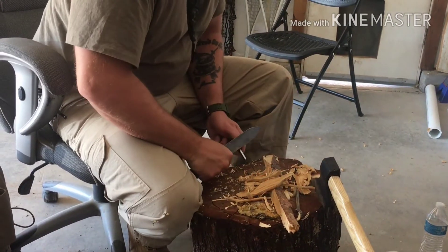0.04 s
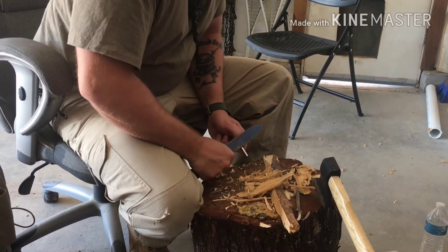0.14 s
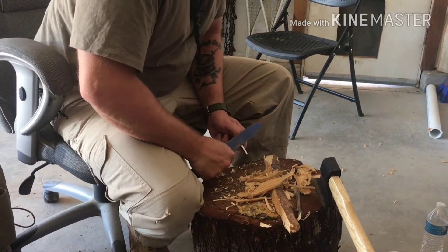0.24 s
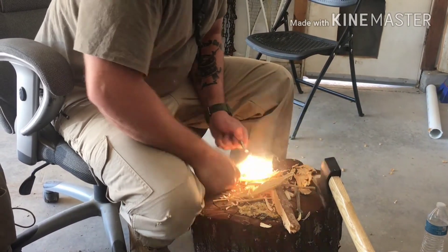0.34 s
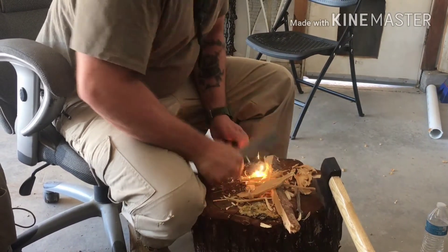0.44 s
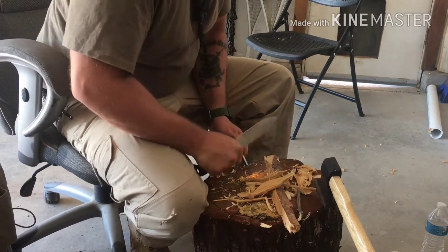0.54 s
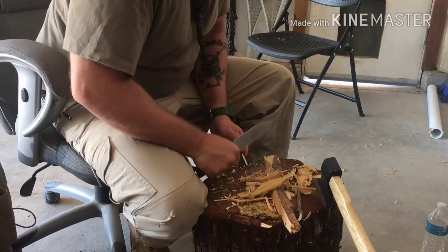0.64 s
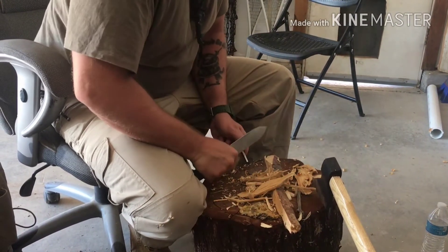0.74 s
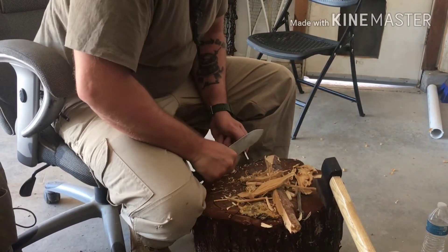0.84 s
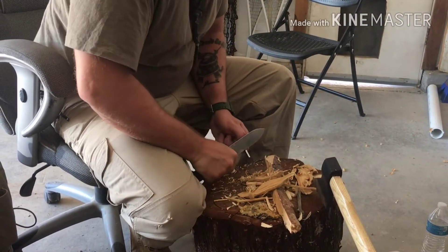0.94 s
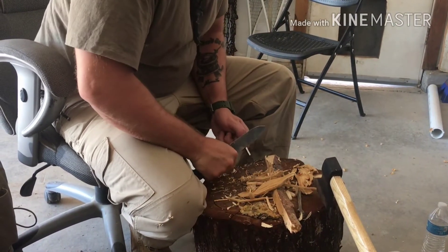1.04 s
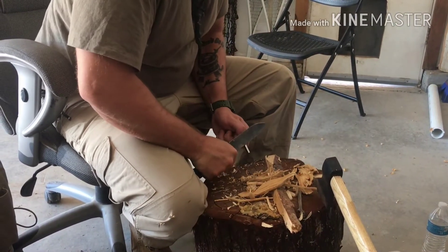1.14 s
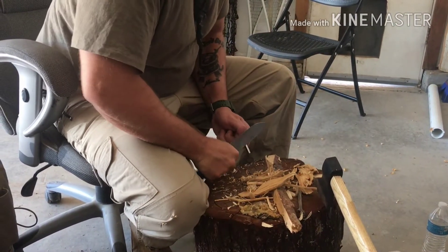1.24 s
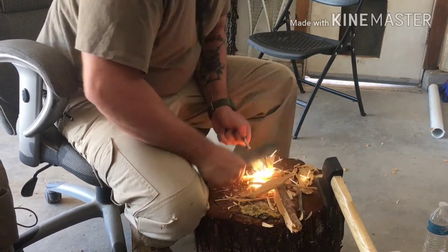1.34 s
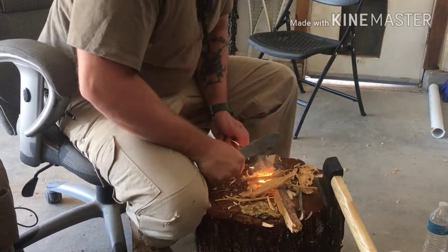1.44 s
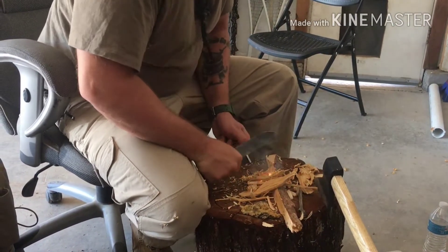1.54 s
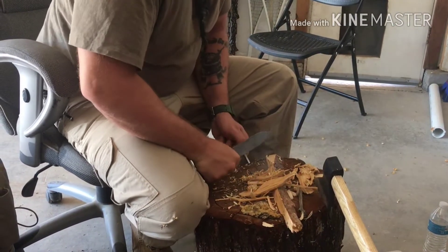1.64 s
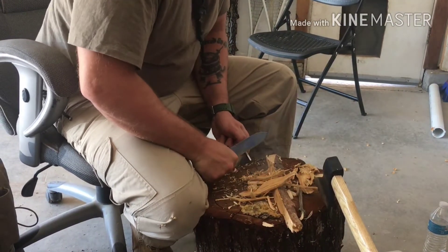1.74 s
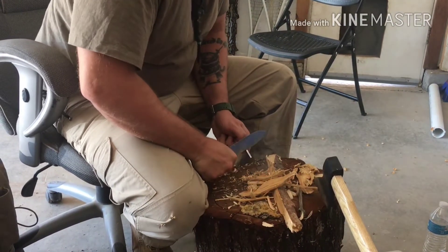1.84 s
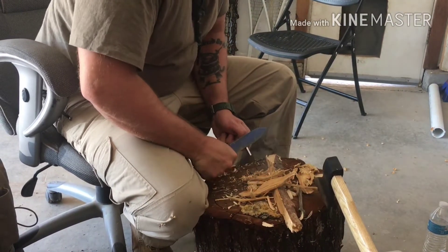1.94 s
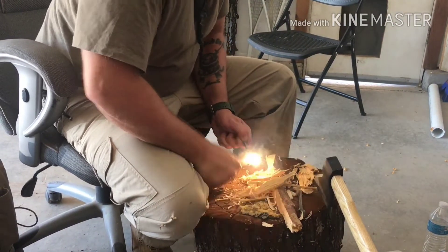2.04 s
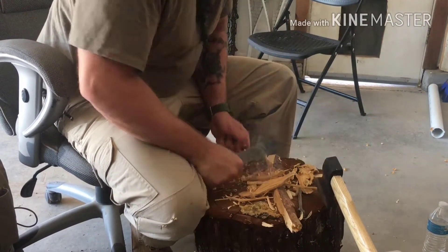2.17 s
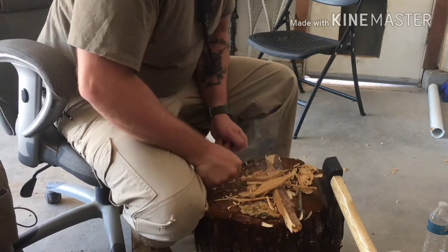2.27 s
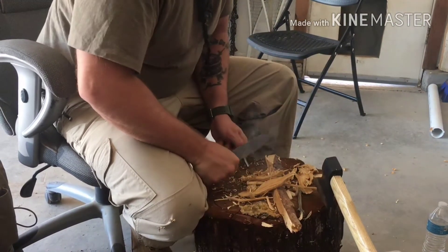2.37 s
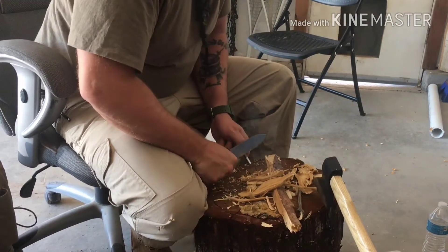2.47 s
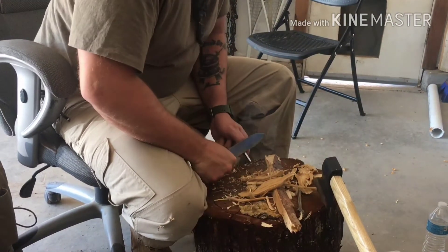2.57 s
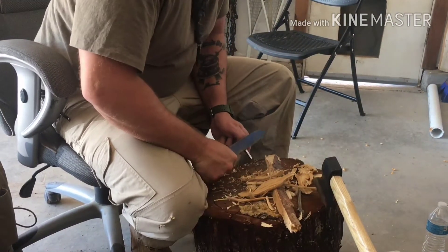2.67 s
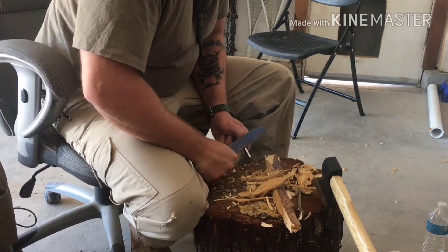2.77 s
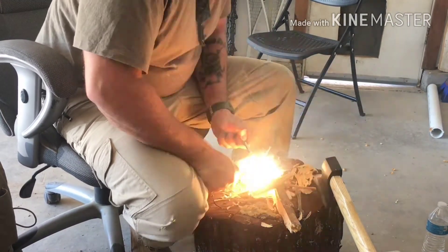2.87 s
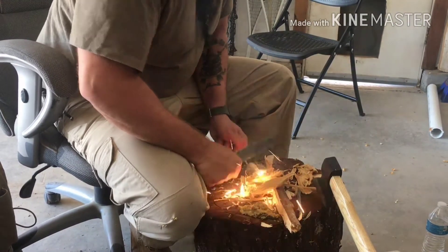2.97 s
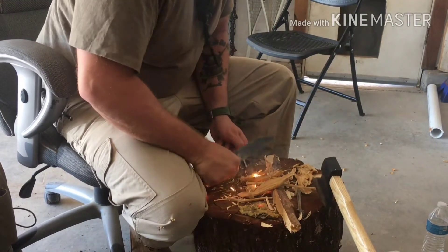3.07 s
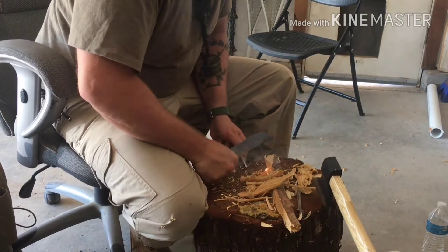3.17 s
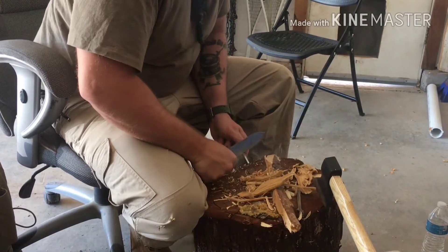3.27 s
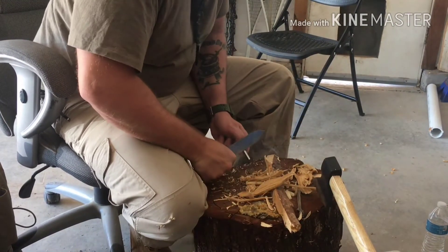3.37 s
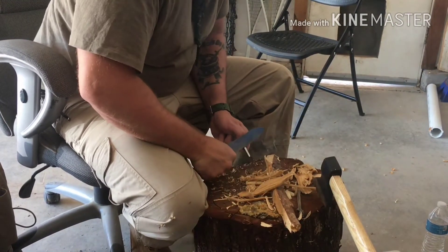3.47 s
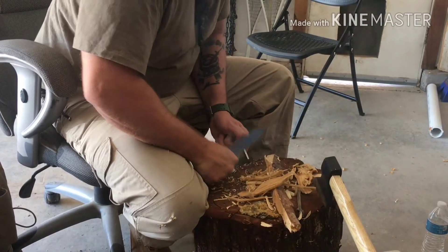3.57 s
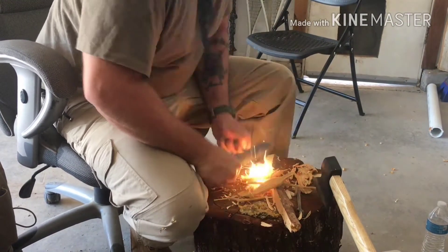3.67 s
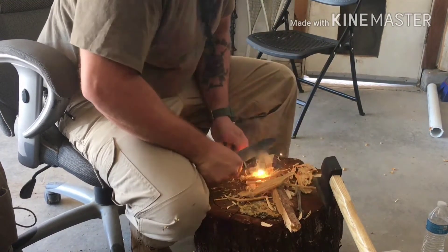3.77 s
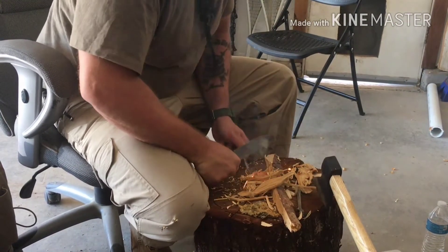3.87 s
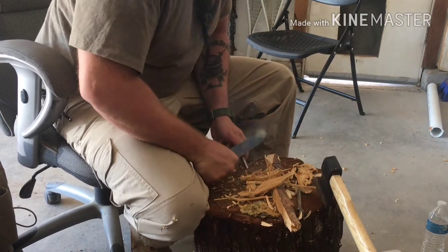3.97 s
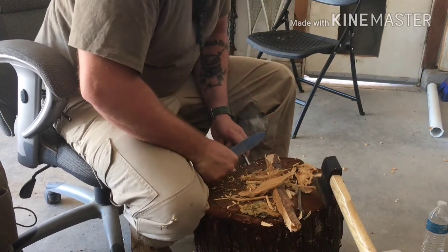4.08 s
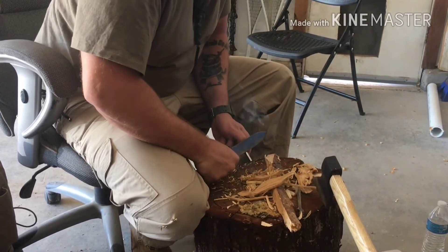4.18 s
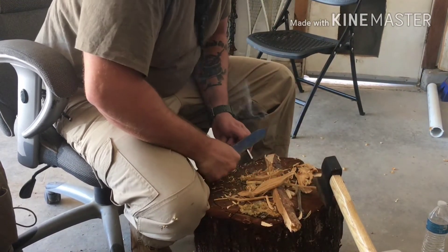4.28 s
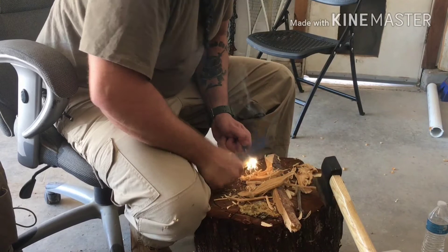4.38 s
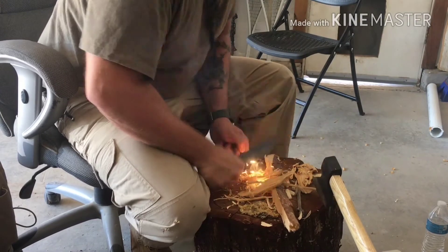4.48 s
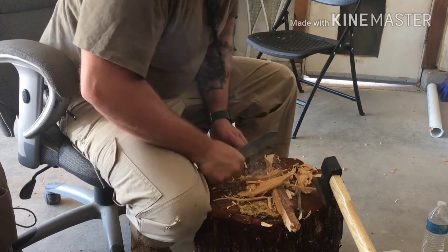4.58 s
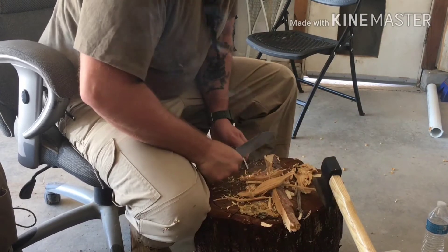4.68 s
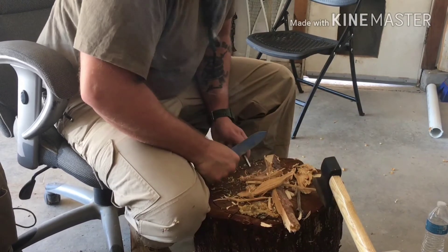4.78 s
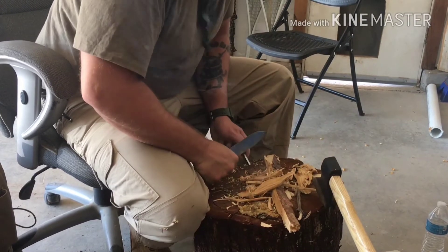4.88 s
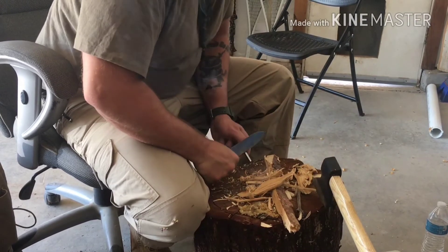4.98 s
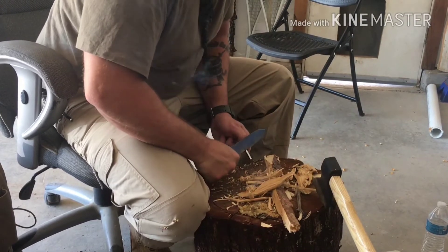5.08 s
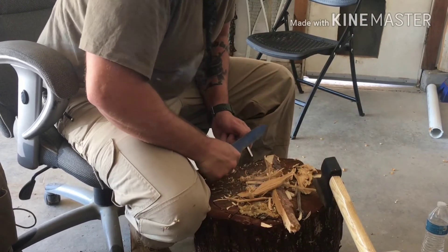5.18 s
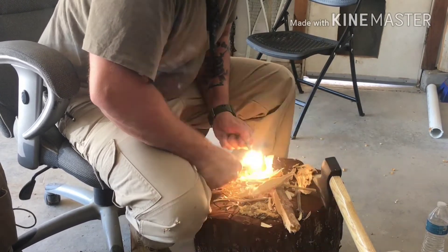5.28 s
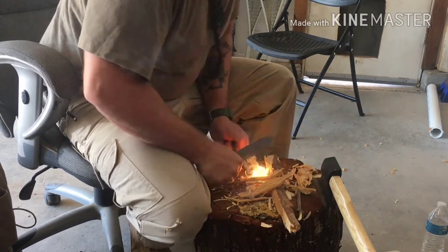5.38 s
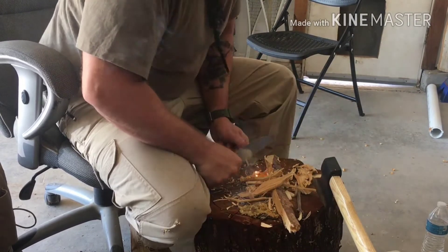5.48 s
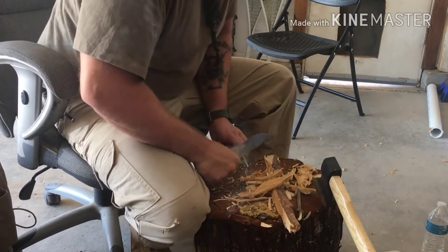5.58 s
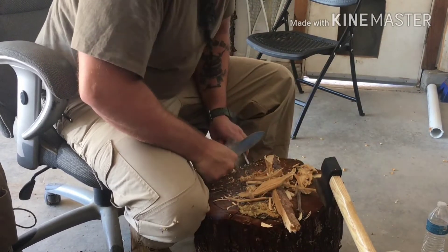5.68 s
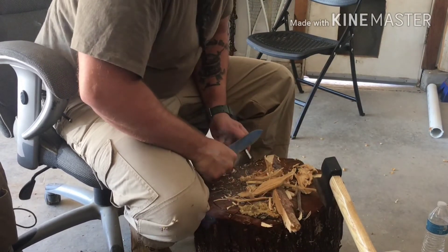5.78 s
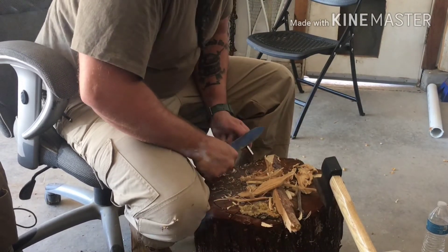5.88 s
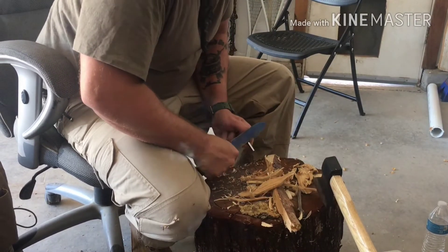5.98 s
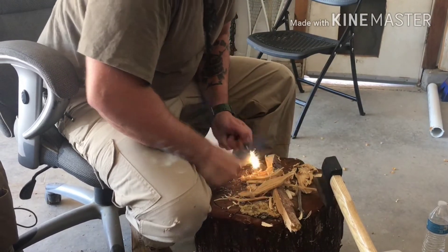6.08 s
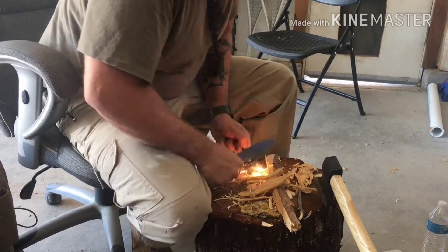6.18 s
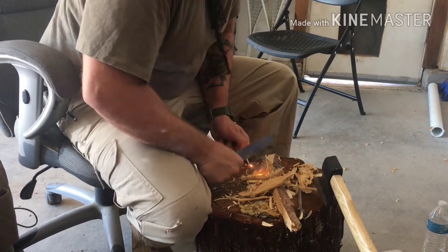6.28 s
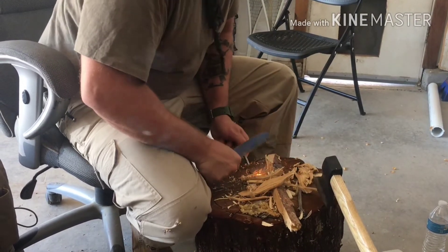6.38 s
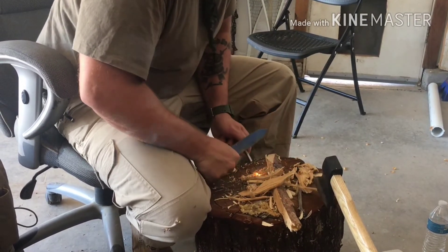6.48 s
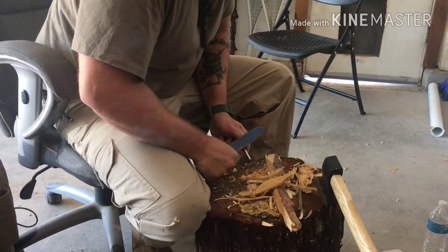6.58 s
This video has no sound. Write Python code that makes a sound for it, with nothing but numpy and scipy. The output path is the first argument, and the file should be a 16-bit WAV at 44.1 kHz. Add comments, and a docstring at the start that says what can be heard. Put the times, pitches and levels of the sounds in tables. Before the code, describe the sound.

A steel edge clicks onto a ferrous rod and tears down it in a very short, harsh scrape, again and again, eight times at a steady pace. Sparks crackle and fizz after each, and the blade rings briefly. Hard garage walls return a short bright echo. Between strokes come a soft hand rub, small woody knocks and late sputters, over quiet air, hum and fading rumble. Close microphone.

```python
"""A knife blade is scraped eight times down a fire steel, in a garage with a faint hum and a low rumble.
Each stroke is friction noise through the modes of blade and rod: a click, a light glide, then a bite that squeals,
rasps and locks onto one resonance after another. Decaying sines let the blade ring on between strokes.
Burning shavings are coloured fracture noise: a hiss, a soft puff and late sputters. A rub, woody knocks and a hollow
note are also heard; noise that decays faster in the treble makes the answer of the bare walls."""
import sys
import numpy as np
from scipy import signal
from scipy.fft import rfft, irfft, next_fast_len
from scipy.io import wavfile
from scipy.ndimage import map_coordinates

SR = 44100
rng = np.random.default_rng(int(sys.argv[2]) if len(sys.argv) > 2 else 0)


def generate_wav(signal):
    """Clip the signal to [-1, 1] and save it as 16-bit WAV at the path in sys.argv[1]."""
    frames = np.transpose(np.atleast_2d(signal))
    scaled = np.clip(frames, -1, 1) * 32767
    pcm = np.round(scaled).astype(np.int16)
    wavfile.write(sys.argv[1], SR, pcm)


N = 291929

# Strokes of the blade: (bite [s], glide length [s], rasp length [s], force [dB], low rod ring [dB re force],
# treble [dB re force], squeal [dB re force], flare reference [dB], ring as the edge flicks off the rod [dB],
# favoured ring [Hz])
STROKE_ROWS = [(0.409, 0.02, 0.021, -31, -1.5, -1.5, -2.5, -33.5, -50, 2350),
               (1.359, 0.0087, 0.018, -31.5, 8, -3.5, -6.5, -36, -60, 3100),
               (2.125, 0.016, 0.021, -28.5, -2.5, 0.5, -1.5, -35, -50.5, 2330),
               (2.921, 0.028, 0.023, -29.5, -1, -1, 4, -34.5, -38.5, 2770),
               (3.682, 0.024, .022, -31.5, 1, -1.5, 5.5, -33.5, -51, 2330),
               (4.461, 0.019, 0.018, -22.5, -10.5, 3.5, -2.5, -31.5, -41.5, 2804),
               (5.347, 0.026, .028, -29, 4.5, -2.5, -5, -36.5, -55.5, 1218),
               (6.158, .022, .021, -27.5, 0, 0.5, 1.5, -35, -50, 4040)]
# Modes of blade and rod pressed together: (frequency [Hz], width [Hz], level [dB])
STEEL_MODES = [(1008, 98, -0.5), (1215, 32, 6.5), (1720, 130, -6.5), (2125, 110, -2.5), (2390, 39, 1),
               (2800, 47, -8.5), (3296, 410, -2), (4074, 100, -4), (4360, 430, -12.5), (5350, 620, -6.5),
               (5780, 530, -7.5), (6870, 220, -13), (8480, 150, -10), (9100, 660, -8.5), (11410, 200, -4),
               (12210, 320, -8.5), (15200, 360, -8)]
# The blade is set on the rod: (time [s], level [dB], then low, middle, high and top modes [dB re level],
# as the point of contact favours them)
LANDINGS = [(0.1768, -40, 4.5, -0.5, 6, -12), (1.017, -53.5, 8, -2.5, -10, -16),
            (1.8854, -32.5, -5.5, 2.5, 2.5, 2.5), (2.639, -51, 1, 1, -6, -7),
            (3.432, -44.5, -2, -1, -13, -6), (4.239, -31.5, -5.5, -1.5, -7.5, -10),
            (5.094, -46.5, 0, -3.5, -10, -19), (5.9, -43, -6, 1.5, -2, -8), (6.610, -49.5, 1, -2, 0, -1.5)]


def amp(db):
    """Level to amplitude: 20 dB are a factor of ten."""
    return 10 ** (np.asarray(db) / 20)


def unit(x):
    """Normalization by the root mean square, to rms 1."""
    return x / np.sqrt(np.mean(x ** 2) + 1e-20)


def along(points, hz):
    """Linear interpolation of (frequency [Hz], value) points on a logarithmic frequency axis."""
    f, v = np.transpose(points)
    return np.interp(np.log(hz + 1), np.log(f), v)


def clock():
    """Uniform sampling: the time of every sample, in s."""
    return np.arange(N) / SR


def wobble(rate):
    """Band-limited random modulation: a smooth curve through random knots, rate of them a second."""
    knots = rng.standard_normal(int(N * rate / SR) + 4)
    return map_coordinates(knots, [np.arange(N) * rate / SR])


def filtered(x, response):
    """Linear filtering: the spectrum of x is multiplied by a response of frequency."""
    m = next_fast_len(len(x) + SR // 10)
    hz = np.fft.rfftfreq(m, 1 / SR)
    return irfft(rfft(x, m) * response(hz), m)[:len(x)]


def coloured(x, points):
    """Spectral shaping by (frequency [Hz], level [dB]) points, at rms 1."""
    return unit(filtered(x, lambda hz: amp(along(points, hz))))


def grit(rate, spread_db, smooth):
    """Shot noise: tiny fractures at random moments and of random, bounded sizes, over a share of even noise."""
    moments = rng.random(N) < rate / SR
    signs = rng.choice([-1, 1], N)
    sizes = amp(spread_db * np.minimum(rng.standard_normal(N), 1))
    return unit(unit(moments * signs * sizes) + smooth * rng.standard_normal(N))


def gate(t, start, end, rise, fall):
    """Smooth switching: a window that opens around start and closes around end."""
    return (1 + np.tanh((t - start) / rise)) * (1 - np.tanh((t - end) / fall)) / 4


def swell(age, rise, t60):
    """Damped decay: a soft rise, then an exponential fall of 60 dB in t60."""
    age = np.maximum(age, 0)
    return (1 - np.exp(-(age / rise) ** 2)) * amp(-60 * age / t60)


def near(s):
    """Windowing: the samples from shortly before s to half a second after it."""
    return slice(max(0, int(s * SR) - SR // 20), min(N, int(s * SR) + SR // 2))


def resonance(f, hz, width):
    """Response of a damped oscillator: one causal resonance."""
    return 1j * f * width / (hz * hz - f * f + 1j * f * width)


def through(force, envelope, response):
    """Forced vibration: an enveloped force drives a body; the output has the envelope's level."""
    return filtered(force * envelope, response) / np.std(filtered(force, response))


def background():
    """Modulated noise and tones: still air, a lumpy low rumble and the unsteady hum of an appliance."""
    # Still air: (frequency [Hz], level [dB per Hz])
    air_colour = [(88, -28.5), (150, -4.5), (259, -7), (340, -12.5), (850, -13.3), (1440, -17),
                  (2960, -25.5), (7110, -30), (15800, -40.5)]
    # Low rumble: (frequency [Hz], level [dB per Hz])
    rumble_colour = [(20, -21.5), (35, -8.5), (55, 10.5), (80, 6.5), (130, -1.5), (250, -34.5)]
    # Partials of the hum: (frequency [Hz], middle level [dB rms])
    hum_partials = [(58, -74), (120, -68.5), (239, -79)]
    air_db = -67.5
    rumble_db, rumble_fade_db_per_s = -61.5, 1  # the rumble slowly dies down
    t = clock()
    air = coloured(rng.standard_normal(N), air_colour) * amp(air_db + 0.73 * wobble(5.5))
    rumble_level = amp(rumble_db - rumble_fade_db_per_s * t + 3.5 * wobble(10))
    rumble = coloured(rng.standard_normal(N), rumble_colour) * rumble_level
    hum = np.zeros(N)
    for hz, db in hum_partials:
        level = amp(db + 2.8 * wobble(10)) * np.sqrt(2)  # sine peak for an rms level
        hum += level * np.sin(2 * np.pi * hz * t + 0.5 * wobble(10))
    return air + rumble + hum


def touch(hz, low_db, middle_db, high_db, top_db):
    """Modal excitation: how strongly a point of contact drives a mode, in dB."""
    points = [(2200, low_db), (3200, 0), (4100, middle_db), (5200, middle_db), (8700, high_db), (11000, top_db)]
    return along(points, hz)


def clicks(crack_db=-5):
    """Impact excitation: the edge lands on the rod with a tiny crack and a brief, damped ring of the steel."""
    # The blade's brief ring while pressed on the rod: (frequency [Hz], level [dB], t60 [s])
    contact_modes = [(1080, -10.5, 0.015), (2219, 2, 0.01), (3200, 1, 0.0089), (4060, -0.5, 0.01),
                     (4660, -3, 0.008), (5330, -1, 0.0069), (7650, -9.5, .005), (8800, 2, .008),
                     (11360, 0.5, .014), (12300, -13, .012)]
    out, t = np.zeros(N), clock()
    for s, db, *point in LANDINGS:
        w = near(s)
        age = t[w] - s
        out[w] += amp(db + crack_db) * rng.standard_normal(len(age)) * swell(age, rise=.0002, t60=.006)
        for k, (hz, level, t60) in enumerate(contact_modes):
            ring = swell(age, rise=.0001, t60=t60) * np.sin(2 * np.pi * hz * age)
            out[w] += (-1) ** k * amp(db + level + touch(hz, *point)) * ring
    return out


def ringing(landing_db=-26, reach=0.032, flick_spread=.05):
    """Free modal decay: landings and flicks favour different blade modes; the moving hand blurs their phase."""
    # Modes of the free blade: (frequency [Hz], level [dB], t60 [s])
    blade_modes = [(1210, -8, .7), (2170, -4, .3), (2330, -4, .33), (2700, 0, .32), (2810, 0, .32),
                   (3860, -3, .3), (4016, 0, .3), (5170, -4, .26), (8807, -7, .14), (10870, -6, .17),
                   (11420, -4, .14)]
    # Flicks that also catch the blade's tip: (time [s], level [dB])
    tip_flicks = [(.43, -42), (2.146, -32), (4.479, -37)]
    tip_hz = 10870  # the tip's own mode
    out, t = np.zeros(N), clock()
    # (time, dB, favoured Hz, share of all the other modes)
    flicks = [(bite + rasp_s, db, hz, flick_spread) for bite, _, rasp_s, *_, db, hz in STROKE_ROWS]
    flicks += [(s, db, tip_hz, 0) for s, db in tip_flicks]
    for hz, level, t60 in blade_modes:
        drift = wobble(130)
        plucks = []  # (time, gain, phase blur in rad)
        for s, db, *point in LANDINGS:
            landing = db + landing_db + touch(hz, *point) + 2 * rng.standard_normal()
            plucks.append((s, amp(landing), .45))
        for s, db, favoured, others in flicks:
            nearness = np.exp(-(np.log(hz / favoured) / reach) ** 2)
            plucks.append((s, amp(db) * (others + nearness), .85))
        for s, gain, blur in plucks:
            w = near(s)
            tone = np.sin(2 * np.pi * hz * t[w] + blur * drift[w])
            out[w] += gain * amp(level) * swell(t[w] - s, rise=0.00078, t60=t60) * tone
    return out


def garage(x, gap=0.005, build=0.0031):
    """Reverberation as convolution with decaying noise: each stroke has its own tail, whose treble dies first."""
    # Colour of the echo: (frequency [Hz], level [dB])
    echo_colour = [(100, -5), (1200, -0.5), (2800, -1), (5000, 1.5), (10000, -0.5), (15800, 8.5)]
    # Decay between the walls: (frequency [Hz], t60 [s])
    wall_decay = [(100, 0.92), (500, 0.72), (2500, 0.61), (5000, 0.45), (8000, .38), (12000, 0.26),
                  (16000, 0.09)]
    out = np.zeros(N + 2 * SR)
    edges = [0] + [int(row[0] * SR) - SR // 20 for row in STROKE_ROWS[1:]] + [N]
    for a, b in zip(edges, edges[1:]):
        hz, t, z = signal.stft(rng.standard_normal(SR), SR, nperseg=256)
        z = z * amp(along(echo_colour, hz)[:, None] - 60 * t / along(wall_decay, hz)[:, None])
        tail = signal.istft(z, SR)[1]
        since_gap = np.maximum(np.arange(len(tail)) / SR - gap, 0)
        tail = tail * (1 - np.exp(-since_gap / build))
        tail = tail * amp(1.4 * wobble(170)[:len(tail)])  # reflections arrive in clumps
        wet = signal.fftconvolve(x[a:b], tail / np.linalg.norm(tail))
        out[a:a + len(wet)] += wet
    return out[:N]


def steel(f, stretch=1, favour=np.zeros(len(STEEL_MODES))):
    """Modal superposition: the response of blade and rod; the grip shifts the modes and favours some of them."""
    response = 0
    for k, (hz, width, db) in enumerate(STEEL_MODES):
        response = response + (-1) ** k * amp(db + favour[k]) * resonance(f, hz * stretch, width)
    return response


def edge_angle(rod_db, treble_db, squeal_db, hz):
    """Modal coupling: the edge's angle shifts the balance of low rod ring, blade modes and treble, in dB."""
    rival_db = -0.36 * squeal_db  # the next blade modes lose this share of what the squeal takes
    points = [(1300, rod_db), (2000, 0), (2800, rival_db), (3800, rival_db), (5000, 0), (8000, treble_db)]
    return along(points, hz)


def scrapes(arch_db=7, grip_shift=0.0051, grip_db=0.6, edge_db=-8):
    """Friction-driven vibration: the edge glides, then bites in and tears off shavings until it leaves the rod."""
    # Friction under light pressure: (frequency [Hz], level [dB])
    glide_colour = [(300, -26.5), (1100, -5.5), (2200, -9), (3800, -6.5), (6500, -5.5), (9200, 4),
                    (11400, 0.5), (15500, -4)]
    # Friction under full pressure: (frequency [Hz], level [dB])
    rasp_colour = [(200, -23.5), (650, -2), (1000, -3.5), (3000, 1), (14000, 1)]
    # The tearing edge's own noise: (frequency [Hz], level [dB])
    edge_colour = [(900, -32.5), (2500, -9), (5000, -4.5), (7200, 0.5), (10000, -2.5), (13500, -5.5),
                   (15800, -3.5)]
    glide_db, glide_db_per_s = -39.5, 327.5  # level towards the bite, and how fast it grows until then
    out, t = np.zeros(N), clock()
    force = grit(rate=2500, spread_db=4, smooth=.35) * amp(1.5 * wobble(400))
    tearing = coloured(grit(rate=2500, spread_db=4, smooth=.35), edge_colour)
    grips = rng.standard_normal((len(STROKE_ROWS), len(STEEL_MODES) + 1))
    for row, grip in zip(STROKE_ROWS, grips):
        bite, glide_s, rasp_s, force_db, rod_db, treble_db, squeal_db, *_ = row
        w = near(bite)
        age = t[w] - bite
        body = lambda f: steel(f, 1 + grip_shift * grip[0], grip_db * grip[1:])
        glide_level = amp(glide_db + glide_db_per_s * np.minimum(age, 0))
        glide = gate(age, -glide_s, 0, 0.0052, 0.014) * glide_level
        # greatest halfway down the rod
        pressure_db = arch_db * (np.sin(np.pi * np.clip(age / rasp_s, 0, 1)) - .8)
        rasp = gate(age, 0, rasp_s, .003, .0025) * amp(force_db + pressure_db)
        light = lambda f: body(f) * amp(along(glide_colour, f))
        full = lambda f: body(f) * amp(along(rasp_colour, f) + edge_angle(rod_db, treble_db, squeal_db, f))
        out[w] += through(force[w], glide, light)
        out[w] += through(force[w], rasp, full)
        out[w] += amp(edge_db) * (glide + amp(treble_db) * rasp) * tearing[w]  # the edge also radiates by itself
    return out


def squeals(peak_way=0.45, width=0.36, lag=.001, flutter=.45, grain=.5):
    """Beating of twin modes: the bite sets two close blade modes squealing roughly, with a few beats a stroke."""
    middle_hz, beat_hz = 2261, 123  # the twin modes: their middle and their distance
    out, t, drift = np.zeros(N), clock(), wobble(500)
    tearing = unit(filtered(rng.standard_normal(N), lambda f: resonance(f, middle_hz, 900) ** 2))
    for bite, _, rasp_s, force_db, _, _, squeal_db, *_ in STROKE_ROWS:
        w = near(bite)
        age = t[w] - bite
        push = gate(age, -0.0042, rasp_s, 0.0028, 0.0033)
        push = push * np.exp(-((age / rasp_s - peak_way) / width) ** 2 / 2)
        beat = np.cos(np.pi * beat_hz * (age - lag))
        tone = np.sqrt(2) * np.sin(2 * np.pi * middle_hz * age + flutter * drift[w])
        rough_tone = np.sqrt(1 - grain ** 2) * tone + grain * tearing[w]
        out[w] += amp(force_db + squeal_db) * push * beat * rough_tone
    return out


def snags(length=0.0032, flutter=0.36, grain=0.75, angle_share=0.5):
    """Stick-slip: the edge locks onto one resonance after another, each for a few milliseconds."""
    # Chatter in every stroke: (share of the way down the rod, level [dB re force], pitch [Hz])
    chatter_steps = [(.38, -5.5, 11300), (.55, -5.5, 1210), (.75, -3, 3215), (.86, -4, 11600)]
    out, t = np.zeros(N), clock()
    drift, noise = wobble(700), rng.standard_normal(N)
    for bite, _, rasp_s, force_db, rod_db, treble_db, squeal_db, *_ in STROKE_ROWS:
        w = near(bite)
        for way, db, hz in chatter_steps:
            chatter = np.sqrt(2) * np.sin(2 * np.pi * hz * t[w] + flutter * drift[w] * hz / 2300)
            tearing = unit(filtered(noise[w], lambda f: steel(f) * resonance(f, hz, 0.41 * hz)))
            share = np.clip(grain * np.sqrt(hz / 2300), 0, 1)  # high snags are rougher
            level = amp(force_db + db + angle_share * edge_angle(rod_db, treble_db, squeal_db, hz))
            catch = np.exp(-((t[w] - bite - way * rasp_s) / length) ** 2)
            out[w] += level * catch * (np.sqrt(1 - share ** 2) * chatter + share * tearing)
    return out


def sparks(count=2):
    """Combustion noise: shavings ignite with a crackling hiss, hot air puffs a moment later, stragglers sputter."""
    # Hiss of burning shavings: (frequency [Hz], level [dB per Hz])
    hiss_colour = [(200, -43.5), (600, -11.5), (2800, -2), (5000, -5.5), (12000, -6.5), (15800, -12.5)]
    # Puff of hot air: (frequency [Hz], level [dB])
    puff_colour = [(30, -12.5), (60, 3.5), (130, -3.5), (250, 6.5), (420, -6), (700, 0), (1300, -5),
                   (3000, -3.5), (9000, -44.5)]
    # Sputter: (frequency [Hz], level [dB per Hz])
    sputter_colour = [(400, -21.5), (2500, 2), (8000, 0), (15800, -4)]
    # The loudest late sputters and pops of burning metal: (middle [s], level [dB], length [s])
    late_sputters = [(1.513, -49.5, 0.018), (1.615, -49.5, 0.0094), (3.892, -49, .0076),
                     (3.919, -45.5, 0.011), (3.944, -54, .024), (4.147, -53, 0.0023), (4.732, -55.5, 0.038),
                     (5.549, -49.5, .0016), (5.562, -54.5, 0.016)]
    hiss_db, puff_db = 6, -2  # re the flare reference
    # faint sputters after every flare
    straggler_db, straggler_s, straggler_delay_s = -66, 0.034, (0.05, 0.19)
    t, hiss, puff, sputter = clock(), np.zeros(N), np.zeros(N), np.zeros(N)
    stragglers = []
    for row, chances in zip(STROKE_ROWS, rng.random((len(STROKE_ROWS), count))):
        bite, _, rasp_s, *_, flare_db, _, _ = row
        release = bite + rasp_s
        w = near(release)
        hiss[w] += amp(flare_db + hiss_db) * swell(t[w] - release + 0.011, rise=0.01, t60=0.17)
        puff[w] += amp(flare_db + puff_db) * swell(t[w] - release, rise=0.018, t60=0.2)
        delays = np.interp(chances, [0, 1], straggler_delay_s)
        stragglers += [(release + delay, straggler_db, straggler_s) for delay in delays]
    for s, db, length in late_sputters + stragglers:
        w = near(s)
        sputter[w] += amp(db) * np.exp(-(2 * (t[w] - s) / length) ** 2)
    burning = grit(rate=4000, spread_db=5, smooth=.6)
    fizz = coloured(burning, hiss_colour) * amp(1.3 * wobble(160))
    crackle = coloured(grit(rate=2500, spread_db=5, smooth=.7), sputter_colour) * amp(2.5 * wobble(300))
    hot_air = coloured(rng.standard_normal(N), puff_colour)
    return hiss * fizz + puff * hot_air + sputter * crackle


def rub(uneven_db=2.0):
    """Sliding friction: a soft, uneven noise as a hand slides to a new grip."""
    # The sliding hand: (frequency [Hz], level [dB per Hz])
    rub_colour = [(300, -8), (900, 3.5), (1800, 4), (2600, -4), (7000, -15)]
    start_s, end_s, level_db = 0.788, 0.96, -63
    slide = gate(clock(), start_s, end_s, 0.025, 0.017) * amp(level_db + uneven_db * wobble(70.6))
    return slide * coloured(rng.standard_normal(N), rub_colour)


def taps():
    """Impact noise through a broad resonance: small woody knocks between strokes."""
    # Knocks: (time [s], level [dB], strongest frequency [Hz])
    knocks = [(4.125, -48.5, 1700), (6.022, -44.5, 1700)]
    # Colour of the knocks: (frequency [Hz], level [dB])
    knock_colour = [(300, 15), (1500, -4), (7000, -16)]
    out, t = np.zeros(N), clock()
    for s, db, hz in knocks:
        w = near(s)
        age = t[w] - s
        push = amp(db) * (swell(age, rise=0.0008, t60=0.035) + 0.16 * swell(age, rise=0.0088, t60=0.44))
        wood = lambda f: resonance(f, hz, 380) * amp(along(knock_colour, f))
        out[w] += through(rng.standard_normal(len(push)), push, wood)
    return out


def hollow():
    """Damped resonance: a brief hollow note with a wavering pitch in the hardest flare."""
    # Partials of the note: (frequency [Hz], level [dB], t60 [s])
    hollow_modes = [(586, -37, .16), (838, -38, .11)]
    start_s = 4.496
    t, drift = clock(), wobble(120)
    out = np.zeros(N)
    for hz, db, t60 in hollow_modes:
        tone = np.sin(2 * np.pi * hz * t + 0.34 * drift)
        out += amp(db) * swell(t - start_s, rise=0.0021, t60=t60) * tone
    return out


def scene():
    """Superposition: steel, sparks and handling, their echo, and the background."""
    scrape, click = scrapes() + snags() + squeals(), clicks()
    rest = ringing() + sparks() + taps() + rub() + hollow()
    echo = garage(amp(-13.5) * scrape + amp(-10.5) * click + amp(-8) * rest)
    return (scrape + click + rest + echo + background())[None]


def record(dry):
    """Band limiting: the highest treble rolls off, and nothing sounds above about 16 kHz."""
    treble_rolloff = [(14800, 0.0), (15800, -8.5)]  # (frequency [Hz], level [dB])
    top_hz = 15950  # middle of the 200 Hz wide final slope
    band = lambda hz: np.clip((top_hz - hz) / 200 + .5, 0, 1)
    response = lambda hz: amp(along(treble_rolloff, hz)) * band(hz)
    return np.array([filtered(channel, response) for channel in dry])


dry = scene()
out = record(dry)
generate_wav(out)
```